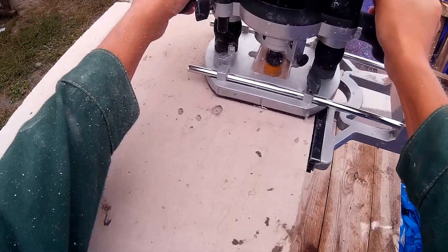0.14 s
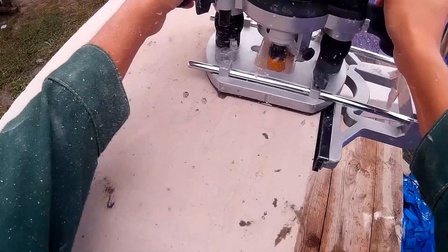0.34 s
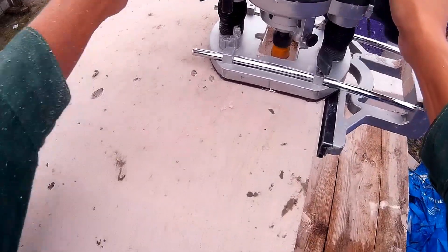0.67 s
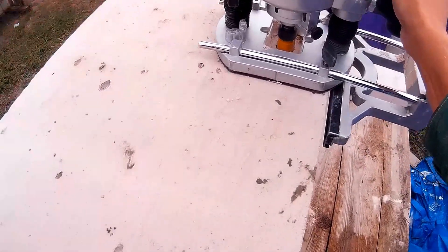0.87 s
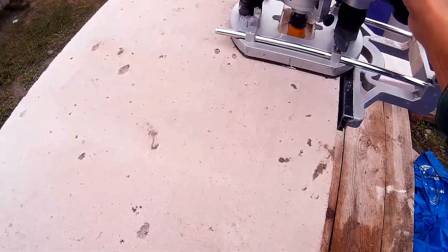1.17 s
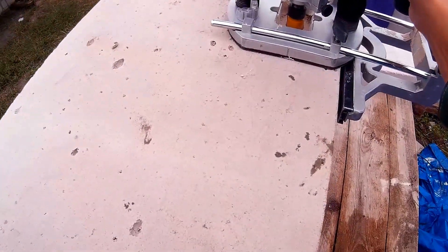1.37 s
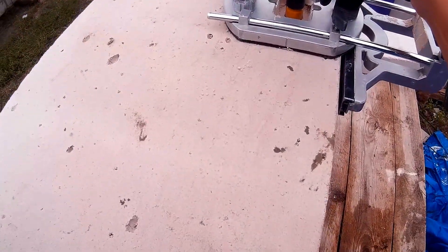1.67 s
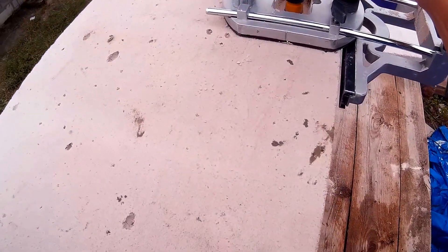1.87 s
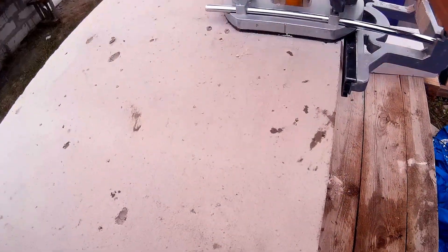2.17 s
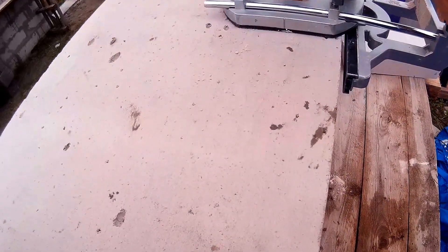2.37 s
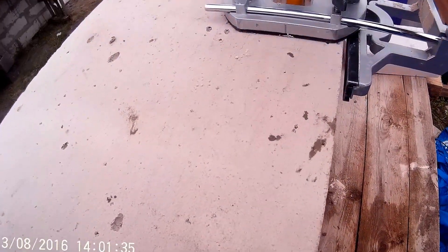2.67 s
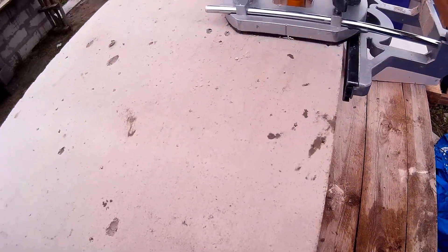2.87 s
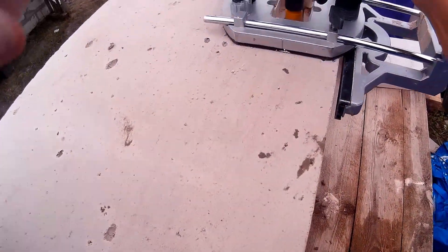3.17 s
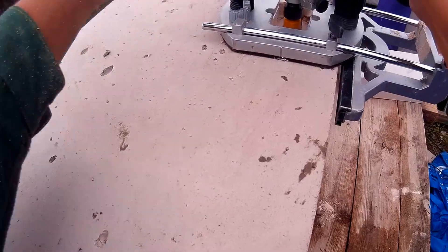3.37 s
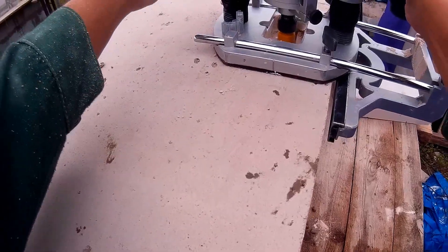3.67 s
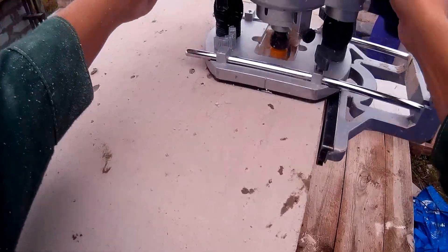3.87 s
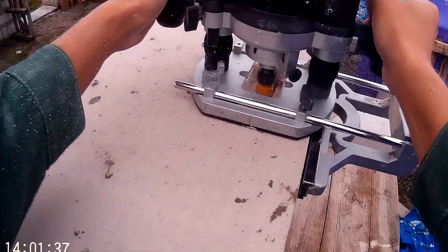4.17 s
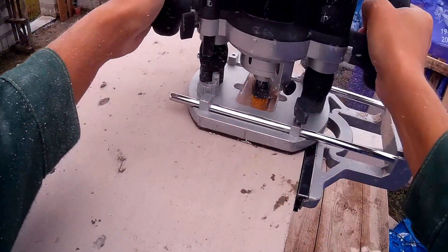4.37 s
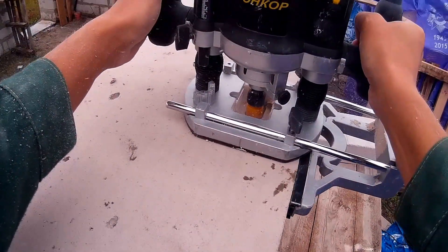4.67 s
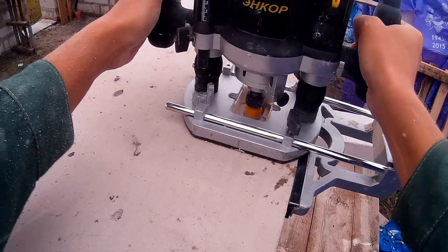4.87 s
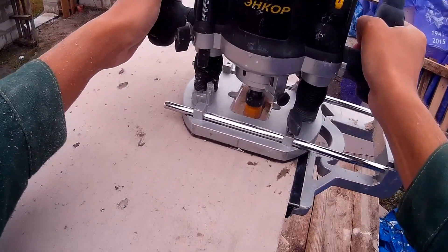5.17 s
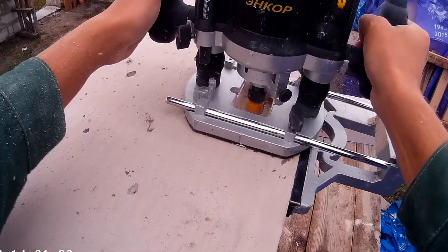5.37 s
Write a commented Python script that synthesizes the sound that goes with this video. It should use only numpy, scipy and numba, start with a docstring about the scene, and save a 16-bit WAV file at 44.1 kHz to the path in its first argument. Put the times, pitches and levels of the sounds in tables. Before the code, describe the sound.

A handheld electric router is heard close and dry through one microphone inside a closed camera case on the worker's head. From 0 to 0.5 s it cuts, a dense buzzing whine around 240 turns per second with gritty chip noise and sharp little ticks near 0.14 and 0.5 s. From about 0.5 s it lifts out, gliding up by roughly a major third over more than a second into a clearer, singing, wavering free-running whine with cooling-air hiss. A hand touches the case from 1.15 s with soft scuffs and small bumps. Hard, clipped thuds hit at 2.1 and 2.72 s, with rubbing, knocks and low rumble until 3.1 s; the motor ducks briefly after the loudest. Around 3.7 s the cutter bites again, pitch sagging until 4.6 s and growing rough, then rising slightly near 5 s. Bright grit ticks at 4.29, 5.17 and 5.39 s; cutting continues to the end at 5.5 s.

```python
"""A handheld router cuts a groove in a block, lifts out to run free, and bites again: shaft-locked motor,
bearing and cutter tones, with resonant noise for cooling air and flying chips. On the closed camera case
on the worker's head, a hand presses (low rumble), wipes (jerky noise) and bumps (damped swings), and grit
ticks (short high noise). The recorder ducks after loud peaks, clips, and cuts the top."""
import sys
import numpy as np
from scipy import signal
from scipy.fft import rfft, irfft
from scipy.io import wavfile
from scipy.ndimage import uniform_filter1d
from numba import njit

SR = 44100
rng = np.random.default_rng(int(sys.argv[2]) if len(sys.argv) > 2 else 0)


def waveform_to_disk(signal):
    """Save audio, clipped to [-1, 1], as 16-bit WAV at the path in sys.argv[1]."""
    frames = np.transpose(np.atleast_2d(signal))
    scaled = np.clip(frames, -1, 1) * 32767
    samples = np.round(scaled).astype(np.int16)
    wavfile.write(sys.argv[1], SR, samples)


N = 243873
T_S = np.arange(N) / SR

# Resonance widths are full widths at -6 dB.
# shaft speed: (time [s], rate [turns/s])
SHAFT_SPEED = [(0, 240), (.25, 238), (.5, 240), (.6, 249.7), (.75, 269), (.9, 283), (1.1, 294.5),
               (1.4, 303.3), (1.8, 309.4), (2.4, 312.1), (3.65, 311.6), (3.77, 306), (3.9, 287.4),
               (4.1, 266.5), (4.4, 244), (4.52, 238.8), (4.7, 237.8), (5, 251.3), (5.12, 252.6),
               (5.53, 249.5)]
# rotor (whole multiples), slots and fan (26-28, 36), ball bearings (others):
# (multiple of shaft rate, relative level [dB])
MOTOR_TONES = [(1, -13), (2, -11), (4, -8), (5, -5.5), (6, -21.5), (7, -19), (8, -10), (9, -9.5),
               (15.22, -14), (17.25, -20), (22.62, -22.5), (26.04, -21.5), (27, -20.5), (28.05, -35),
               (33.46, -68), (34.47, -52), (36, -27), (39.88, -36.5), (41.29, -38), (42.29, -44),
               (45.3, -53), (46.6, -61)]
# one ball bearing and its sidebands: (multiple of shaft rate, relative level [dB])
BEARING_TONES = [(4.42, -8), (5.42, -9.5), (6.42, -6.5), (9.83, -5.5), (10.83, -26), (11.83, -7)]
# blows of two cutter edges of unequal reach: (multiple of shaft rate, relative level [dB])
CUTTER_TONES = [(1, -67), (2, -2.5), (3, -0.5), (4, -6.5), (5, -14.5), (6, -6), (7, -12.5), (8, -4.5),
                (9, -20), (10, -13), (12, -8), (16, -27), (18, -7)]
# motor frame resonances: (frequency [Hz], width [Hz], gain [dB])
FRAME_MODES = [(315, 18, -4), (1257, 69, 5), (1903, 240, 0.5), (3577, 450, -4.5), (3944, 400, 4),
               (6900, 900, -3.5), (7540, 400, 1.5), (8410, 600, 0.5), (10900, 4100, -4), (13000, 1500, -4)]
# block and base plate resonances: (frequency [Hz], width [Hz], gain [dB])
BLOCK_MODES = [(579, 137, -4), (1150, 63, -45), (1223, 170, 7), (1843, 217, 4.5)]
# cooling air through the housing: (frequency [Hz], width [Hz], gain [dB])
HOUSING_MODES = [(348, 440, -21), (600, 130, -21), (984, 390, -8.5), (1203, 174, 1.5), (1640, 200, -15.5),
                 (2266, 120, -36), (2750, 88, -16), (3500, 200, -17), (4350, 790, -20), (5570, 470, -28),
                 (7390, 1230, -20.5), (8980, 1030, -16.5), (10700, 950, -27), (12400, 1200, -41),
                 (14300, 1500, -52)]
# dust and chips in the groove: (frequency [Hz], width [Hz], gain [dB])
GROOVE_MODES = [(324, 540, -33), (556, 550, -18), (947, 300, -7), (1212, 147, -2), (1550, 210, -12),
                (1885, 265, -0.5), (2295, 550, -12.5), (3000, 340, -7.5), (3723, 640, -10),
                (4160, 1600, -15.5), (5656, 620, -14.5), (7640, 640, -20), (8955, 660, -12.5),
                (10710, 1440, -18), (12300, 1300, -36), (14400, 1700, -35.5)]
# motor level, louder at speed and as the head leans in: (time [s], level [dB])
MOTOR_LEVEL = [(0, -33.5), (.45, -32), (.72, -34.5), (1.1, -32), (1.5, -29), (2, -31), (2.6, -29.5),
               (3.2, -31), (3.75, -29), (4.05, -31.5), (4.6, -32.5), (5.53, -32)]
# motor tone tilt about 4x shaft rate: (time [s], tilt [dB/octave])
MOTOR_TILT = [(0, 1.5), (.45, 2.5), (.65, 5), (1.1, 1.5), (2.2, 2.5), (2.9, 1), (3.3, 2.5), (3.6, 3.5),
              (3.85, 4), (4.3, 2), (4.8, 2), (5.05, 3), (5.53, 2.5)]
# bearing tones: (time [s], level relative to motor [dB], tilt about 4x shaft rate [dB/octave])
BEARING_SONG = [(0, 1, 3), (.5, -10, 3), (.9, 5.5, 0.5), (1.25, 7, -3.5), (1.45, 0.5, 5.5), (1.85, 0.5, 5),
                (2.1, 3, 0), (2.95, 2, -4), (3.1, 4, 1), (3.7, 2.5, -1), (3.9, -0.5, 1), (4.2, 5, 2.5),
                (5.53, 3, 0)]
# cutter leaving the groove and plunging again:
# (time [s], bite [dB], hardness: blow tilt about 4x shaft rate [dB/octave])
CUTTER_BITE = [(0, -35, 3), (.3, -34.5, 3), (.45, -34.5, 2), (.56, -37.5, 2), (.66, -44, 2),
               (.71, -52.5, 3), (3.6, -53.5, 0), (3.68, -42, -9), (3.78, -32, -4), (3.9, -31.5, -1),
               (4, -37.5, -2), (4.3, -29.5, 2.5), (4.42, -37, -3.5), (5, -33.5, 1), (5.53, -36.5, 1)]
# rumble under the pressing hand: (time [s], level [dB])
HAND_PRESSURE = [(1.12, -59), (1.19, -39), (1.26, -54), (1.31, -36), (1.38, -48), (1.5, -43.5), (1.68, -40),
                 (1.76, -43), (2.05, -31.5), (2.4, -36), (2.65, -32), (2.95, -25.5), (3.02, -32.5),
                 (3.09, -26), (3.14, -64), (3.45, -76), (3.9, -66), (4.25, -58.5), (4.5, -70)]
# grit hitting the case window: (time [s], peak [dB], nominal pitch [Hz])
GRIT_HITS = [(0.1367, -18, 8950), (0.456, -17, 13500), (0.4573, -17, 5070), (.4854, -30, 14000),
             (.5434, -26, 10000), (4.2902, -14.5, 10500), (4.456, -29, 13000), (5.165, -11.5, 9900),
             (5.393, -21, 9800), (5.477, -29, 13500)]
# camera case under a hand: (frequency [Hz], width [Hz], gain [dB])
CASE_MODES = [(573, 374, -7), (1110, 520, -2.5), (1732, 640, 3.5), (3250, 1640, -5), (4120, 880, -5.5),
              (7950, 4000, -16)]
# hand wipes: (time [s], length [s], rms level before flicker [dB], tilt [dB/octave])
HAND_WIPES = [(1.165, 0.0087, -24, -1.5), (1.178, 0.1, -28.5, -2), (1.253, 0.082, -29.5, 0.5),
              (1.398, 0.068, -30, -1), (1.445, 0.089, -28, .5), (1.563, 0.019, -19.5, 1),
              (1.689, 0.092, -31.5, -1.5), (1.739, 0.1, -30.5, -2), (2.335, 0.19, -35, -2),
              (2.674, 0.024, -28, -6), (2.787, 0.1, -21, -4), (2.939, 0.057, -27.5, -7.5),
              (2.989, 0.088, -27.5, -2.5)]
# bumps squeezing the air in the case:
# (time [s], push +1 or release -1, swing peak [dB], pitch [Hz], t60 [s], shell rattle peak [dB])
CASE_BUMPS = [(1.188, 1, -28, 94, 0.055, -23), (1.437, 1, -25, 140, 0.018, -34),
              (1.795, 1, -34, 130, 0.027, -40), (2.089, 1, 1.5, 130, 0.016, 7.5),
              (2.0922, -1, -8, 43, 0.046, -4), (2.1237, 1, 10.5, 118, 0.017, -14),
              (2.1275, -1, 1.5, 54, 0.061, -40), (2.604, 1, -15.5, 95, 0.017, -18),
              (2.713, -1, -21, 190, 0.015, -14.5), (2.7186, 1, 2.5, 35, 0.082, -18),
              (2.7248, -1, 2.5, 410, 0.0045, -10), (2.7305, -1, -0.5, 19, 0.12, -40),
              (2.833, 1, -11.5, 115, .03, -29), (2.9006, 1, -6, 320, 0.0046, -13.5),
              (2.925, 1, -18, 59, 0.0099, -50), (2.935, 1, -16, 40, 0.045, -39.5),
              (2.98, 1, -38, 100, 0.09, -17)]

RUMBLE_FLOOR_DB = -65
DUCK_ABOVE_DB, DUCK_SHARE = -10, 0.96  # share of the excess dB taken off
SENSE_S, RECOVER_S = 0.0025, 0.08  # peak detector time constants
GRAB_S, EASE_S = 0.0088, 0.042  # gain reduction time constants
CLIP_PEAK, TOP_HZ = 0.71, 15800


def undb(db):
    """dB to amplitude gain."""
    return 10 ** (np.asarray(db) / 20)


def unit(x):
    """Scale to rms 1."""
    return x / np.sqrt(np.mean(x ** 2))


def curve(times_s, values):
    """Straight-line interpolation over the whole scene."""
    return np.interp(T_S, times_s, values)


def walk(rate_hz):
    """Random levels, rate_hz new ones per second, smoothed twice; spread near 1."""
    hold = int(SR / rate_hz)
    steps = np.repeat(rng.standard_normal(N // hold + 1), hold)
    smooth = uniform_filter1d(uniform_filter1d(steps, hold), hold)
    return 1.147 * smooth[:N]


def gain_at(hz, modes, valley_db):
    """Power sum of resonances over a valley floor that falls away above 3 kHz."""
    hz = hz + 1  # no division by zero
    power = undb(valley_db) ** 2 / (1 + (hz / 3000) ** 4)
    for mode_hz, width_hz, db in modes:
        detuning = (hz - mode_hz * mode_hz / hz) / width_hz
        power = power + undb(db) ** 2 / (1 + detuning ** 2) ** 2
    return np.sqrt(power)


def ring(x, modes, valley_db):
    """Filter through resonances in the frequency domain."""
    return irfft(rfft(x) * gain_at(np.fft.rfftfreq(N, 1 / SR), modes, valley_db), N)


def tones(table, phase, shaft_hz, modes, valley_db, waver_db, tilt_db):
    """Multiples of the shaft rate that waver independently and swell on crossing a resonance."""
    grid_hz = np.arange(0, SR / 2, 10)
    body = gain_at(grid_hz, modes, valley_db)
    out = 0
    for multiple, db in table:
        level_db = db + waver_db * walk(9) + tilt_db * np.log2(multiple / 4)
        resonance = np.interp(multiple * shaft_hz, grid_hz, body)
        tone = np.sin(multiple * phase + 2 * np.pi * rng.random())
        out = out + undb(level_db) * resonance * tone
    return out


def motor_whine(phase, shaft_hz):
    """Rotor, slot, fan and bearing tones, shaped by the motor frame."""
    tilt_db = curve(*np.transpose(MOTOR_TILT))
    motor = tones(MOTOR_TONES, phase, shaft_hz, FRAME_MODES, valley_db=-11, waver_db=2.5, tilt_db=tilt_db)
    times_s, song_db, song_tilt_db = np.transpose(BEARING_SONG)
    bearing = tones(BEARING_TONES, phase, shaft_hz, FRAME_MODES, valley_db=-13.5, waver_db=3.46,
                    tilt_db=curve(times_s, song_tilt_db))
    return motor + undb(curve(times_s, song_db)) * bearing


def turn_noise(phase, depth, modes, valley_db, waver_db, waver_hz):
    """Resonant noise pulsing once a turn, its level wandering slowly."""
    pulsed = rng.standard_normal(N) * (1 + depth * np.sin(phase))
    return unit(ring(pulsed, modes, valley_db)) * undb(waver_db * walk(waver_hz))


def router():
    """Motor tones and air, plus cutter blows and chip crunch that grow with the bite."""
    speed_hz = uniform_filter1d(curve(*np.transpose(SHAFT_SPEED)), size=SR // 12)  # rotor inertia
    shaft_hz = speed_hz * (1 + 0.000316 * walk(15))
    phase = 2 * np.pi * np.cumsum(shaft_hz) / SR
    motor_db = curve(*np.transpose(MOTOR_LEVEL))
    times_s, bite_db, hardness_db = np.transpose(CUTTER_BITE)
    bite_db, hardness_db = curve(times_s, bite_db), curve(times_s, hardness_db)

    whine = motor_whine(phase, shaft_hz)
    blows = tones(CUTTER_TONES, phase, shaft_hz, BLOCK_MODES, valley_db=-14.5, waver_db=3.0,
                  tilt_db=hardness_db)
    air = turn_noise(phase, 0.055, HOUSING_MODES, valley_db=-36.0, waver_db=0.38, waver_hz=6.43)
    crunch = turn_noise(phase, 0.14, GROOVE_MODES, valley_db=-27, waver_db=0.68, waver_hz=5.61)
    # base plate damps the air in the groove; crunch takes its place
    buried = undb(bite_db) / (undb(bite_db) + undb(-52))
    noise = np.sqrt(1 - 0.98 * buried) * air + np.sqrt(buried) * crunch
    return undb(motor_db) * (noise + whine) + undb(bite_db + 8.5) * blows


def rumble():
    """Slow pressure changes, 12-45 Hz noise, while the hand rests on the case; a faint floor remains."""
    times_s, db = np.transpose(HAND_PRESSURE)
    band = signal.butter(3, [12, 45], "band", fs=SR, output="sos")
    low = unit(signal.sosfilt(band, rng.standard_normal(N)))
    press_db = np.interp(T_S, times_s, db, left=-90, right=-90) + 0.7 * walk(56)
    return low * (undb(press_db) + undb(RUMBLE_FLOOR_DB))


def grit():
    """Each grain rings a high patch of the window: fast-decaying band noise."""
    out, size = np.zeros(N), 400
    decay = undb(-60 * np.arange(size) / SR / 0.0079)
    for time_s, peak_db, hz in GRIT_HITS:
        band = signal.butter(3, [0.55 * hz, 1.25 * hz], "band", fs=SR, output="sos")
        tick = signal.sosfilt(band, rng.standard_normal(size) * decay)
        i = int(time_s * SR)
        out[i:i + size] += undb(peak_db) * tick / abs(tick).max()
    return out


def wipes():
    """Skin slips over the shell in dense tiny jerks, coloured by the case."""
    out, size, lead = np.zeros(N), 2 ** 14, 256
    hz = np.fft.rfftfreq(size, 1 / SR)
    case = gain_at(hz, CASE_MODES, -17.5)
    for time_s, length_s, db, tilt_db in HAND_WIPES:
        start, length = int(time_s * SR) - lead, int(length_s * SR)
        progress = np.clip((np.arange(size) - lead) / length, 0, 1)
        stroke = np.sin(np.pi * progress).clip(0) ** 0.8
        jerks = rng.standard_normal(size) * undb(1.4 * rng.exponential(size=size)) * stroke
        tilt = undb(tilt_db * np.log2((hz + 50) / 1500))
        rub = irfft(rfft(jerks) * case * tilt)
        out[start:start + size] += undb(db) * rub / np.sqrt(np.sum(rub ** 2) / length)
    return out * undb(1.5 * walk(60))  # flicker


def shell_rattle(t_s):
    """Case modes as decaying sines under a 2.2 ms rise, scaled to peak 1."""
    rattle = 0
    for hz, width_hz, db in CASE_MODES:
        rattle = rattle + undb(db) * np.sin(2 * np.pi * hz * t_s) * np.exp(-1.5 * width_hz * t_s)
    rattle = rattle * np.minimum(t_s / 0.0022, 1) ** 2
    return rattle / rattle.max()


def bumps():
    """A quick push or release: a damped swing of trapped air and a short rattle of the shell."""
    out, t_s = np.zeros(N), np.arange(6000) / SR
    rattle = shell_rattle(t_s)
    for time_s, way, peak_db, hz, t60_s, rattle_db in CASE_BUMPS:
        swing = np.sin(2 * np.pi * hz * t_s) * undb(-60 * t_s / t60_s)
        swing = np.sign(way) * undb(peak_db) * swing / swing.max()
        i = int(time_s * SR)
        out[i:i + len(t_s)] += swing + undb(rattle_db) * rattle
    return out


def scene():
    """One microphone feeds both channels."""
    mono = router() + rumble() + grit() + wipes() + bumps()
    return np.tile(mono, (2, 1))


@njit
def follow(x, attack, release):
    """One-pole envelope with separate rise and fall coefficients."""
    y, level = np.empty(len(x)), 0.
    for i in range(len(x)):
        level += (x[i] - level) * (attack if x[i] > level else release)
        y[i] = level
    return y


def record(dry):
    """Gain control ducks just after loud peaks and creeps back; the converter clips; the top is cut."""
    mono = dry[0]
    peak = follow(abs(mono), 1 / (SENSE_S * SR), 1 / (RECOVER_S * SR))
    over_db = 20 * np.log10(np.maximum(peak / undb(DUCK_ABOVE_DB), 1))
    duck_db = follow(DUCK_SHARE * over_db, 1 / (GRAB_S * SR), 1 / (EASE_S * SR))
    clipped = np.clip(mono * undb(-duck_db), -CLIP_PEAK, CLIP_PEAK)
    low_pass = signal.ellip(10, 0.2, 75, TOP_HZ, fs=SR, output="sos")
    return np.tile(signal.sosfilt(low_pass, clipped), (2, 1))


dry = scene()
out = record(dry)
waveform_to_disk(out)
```